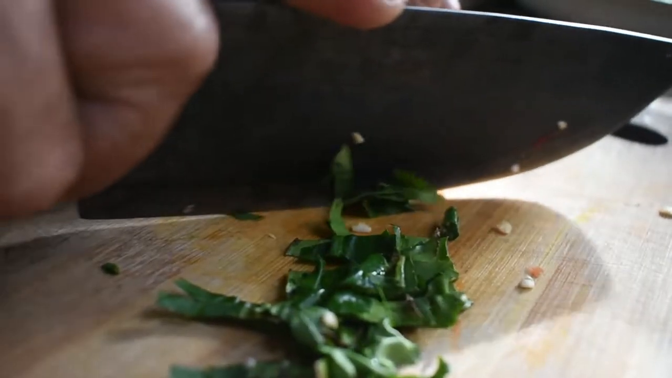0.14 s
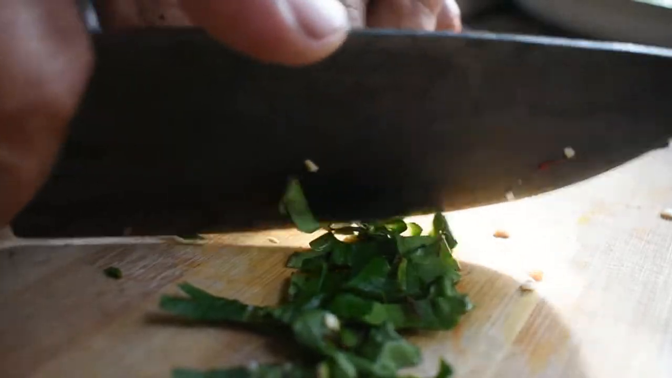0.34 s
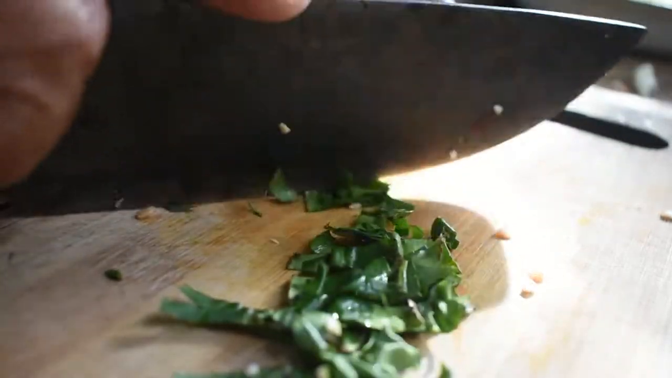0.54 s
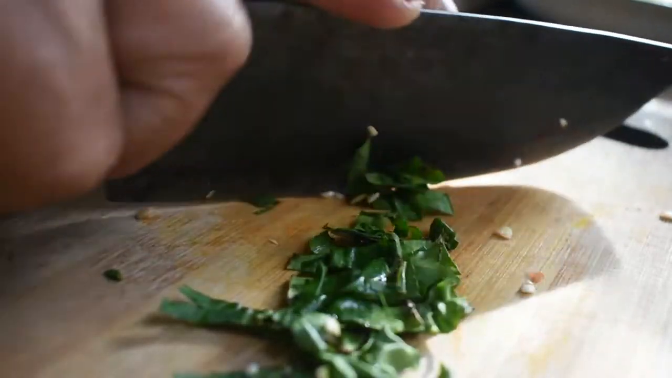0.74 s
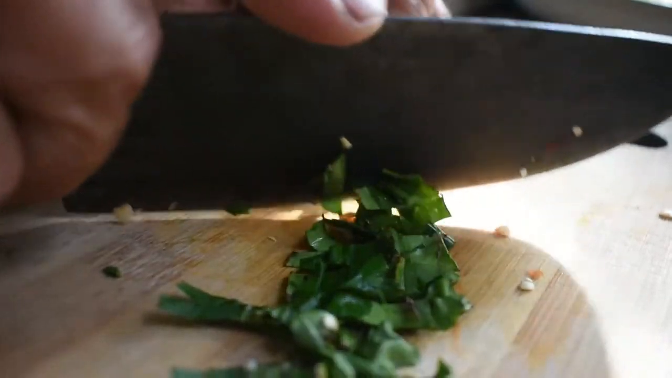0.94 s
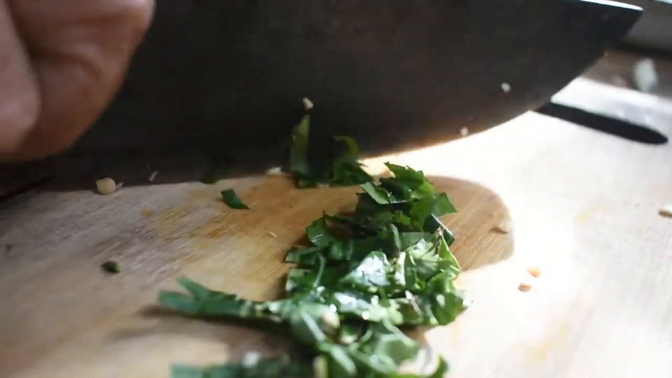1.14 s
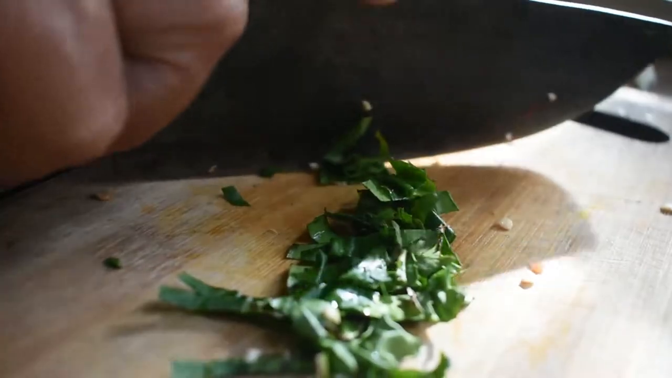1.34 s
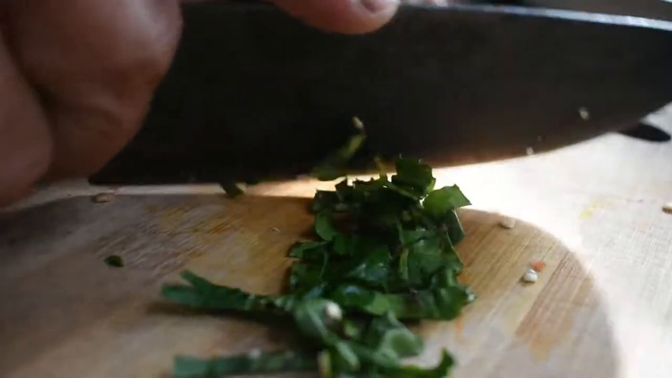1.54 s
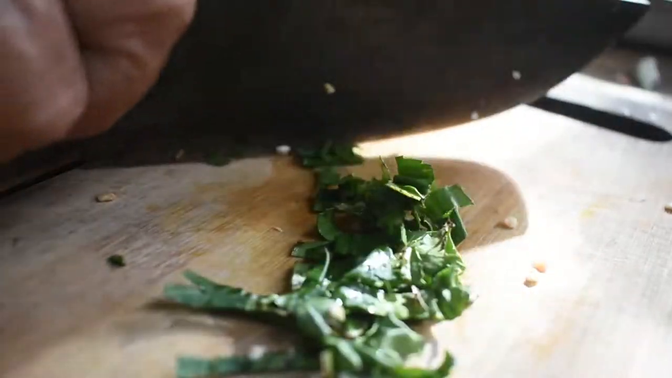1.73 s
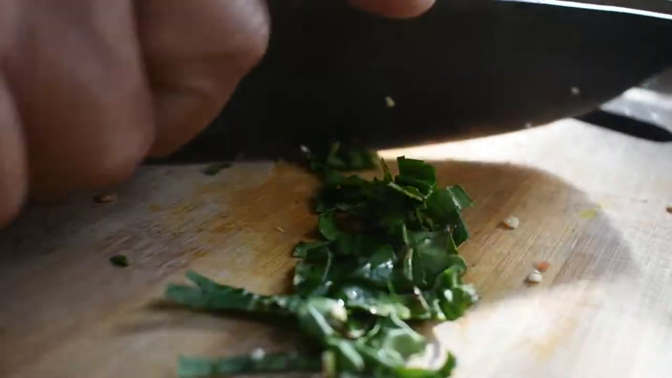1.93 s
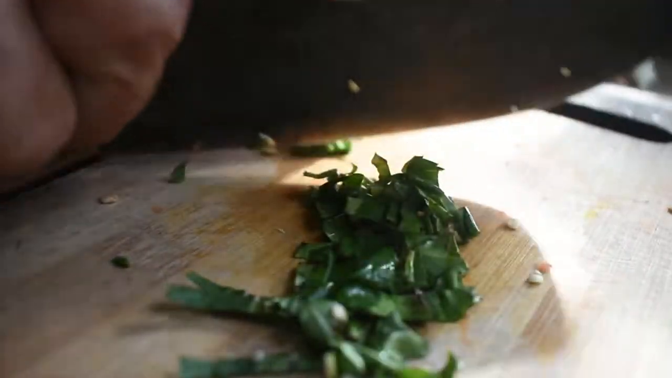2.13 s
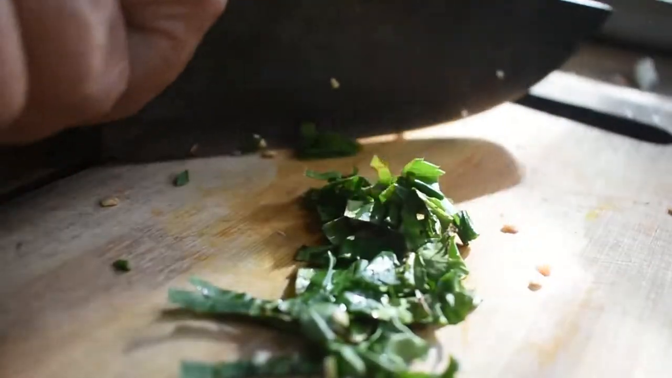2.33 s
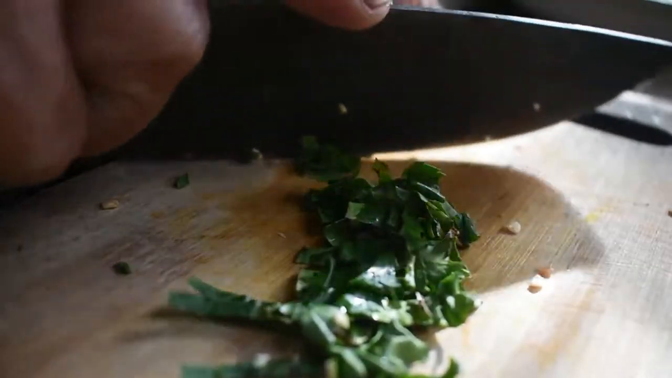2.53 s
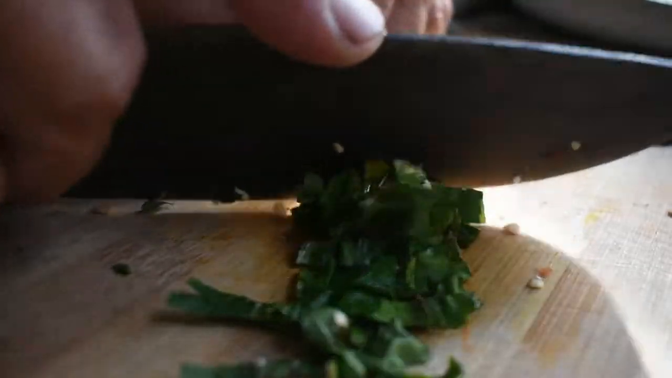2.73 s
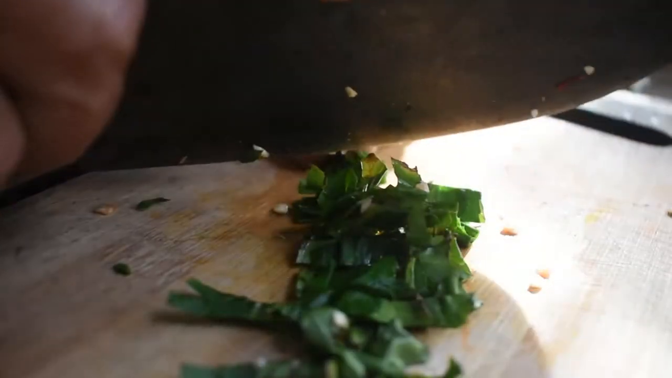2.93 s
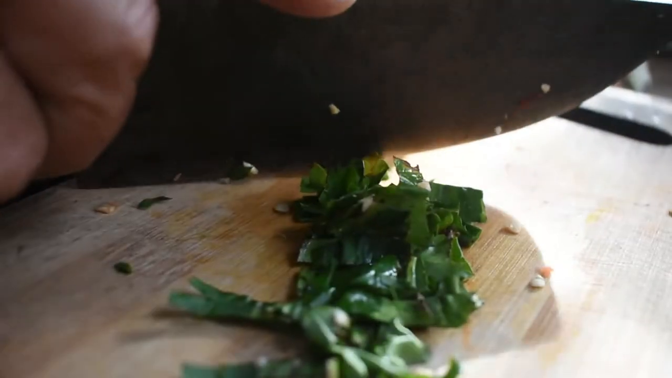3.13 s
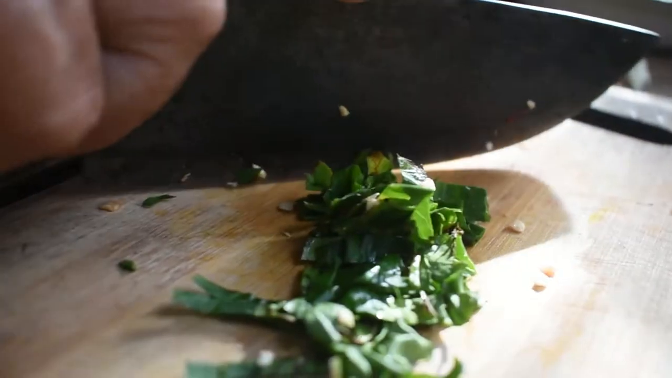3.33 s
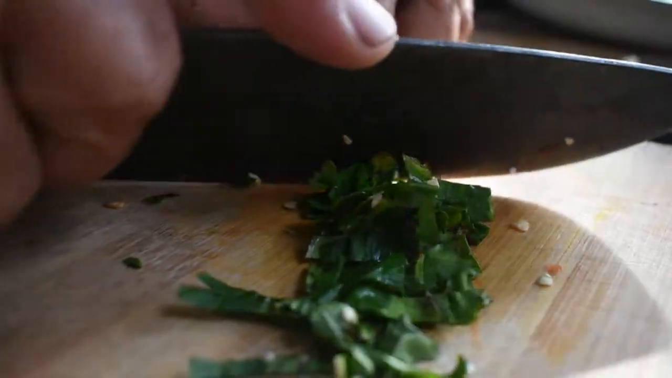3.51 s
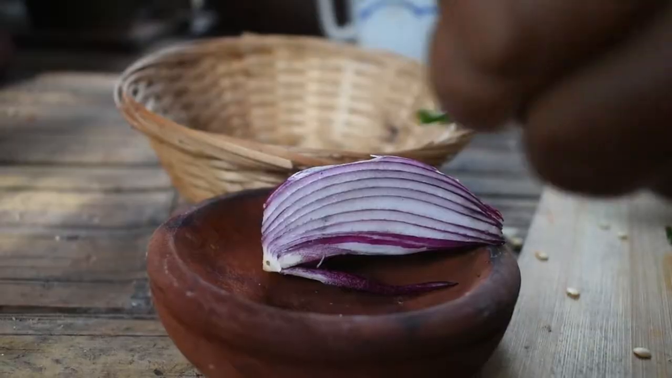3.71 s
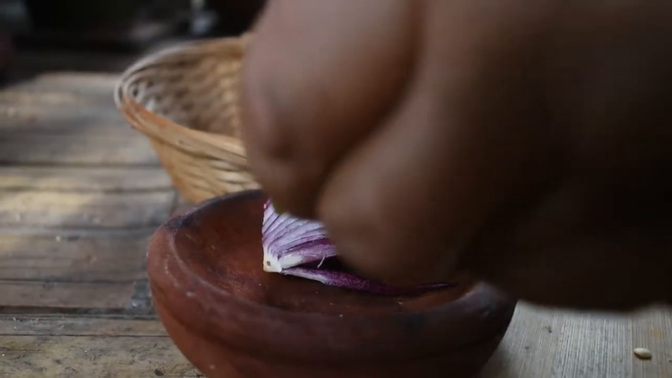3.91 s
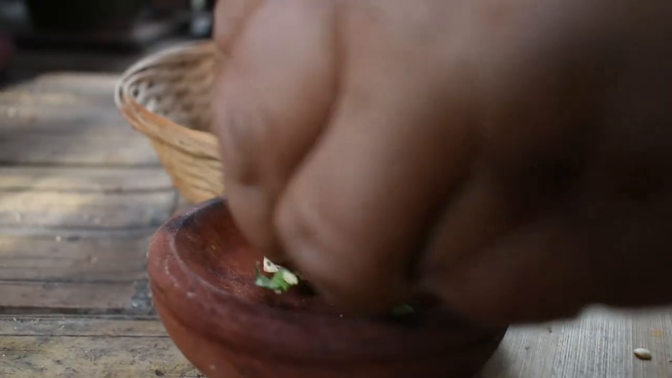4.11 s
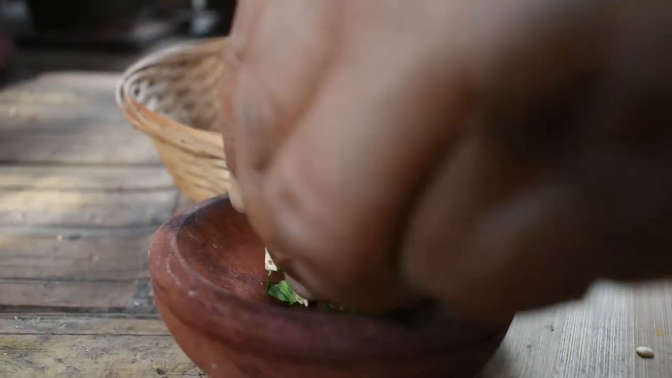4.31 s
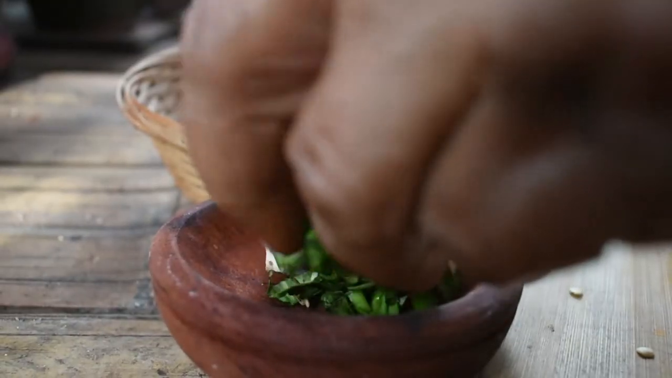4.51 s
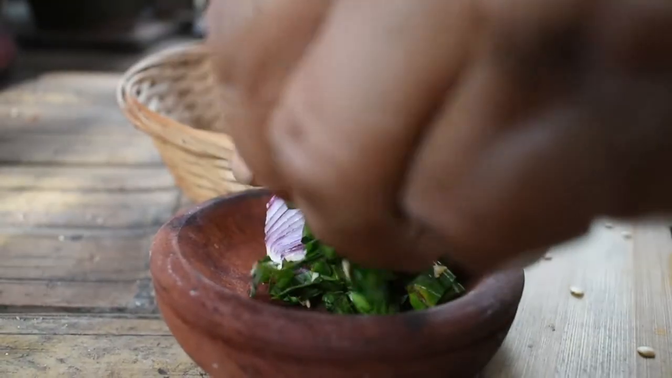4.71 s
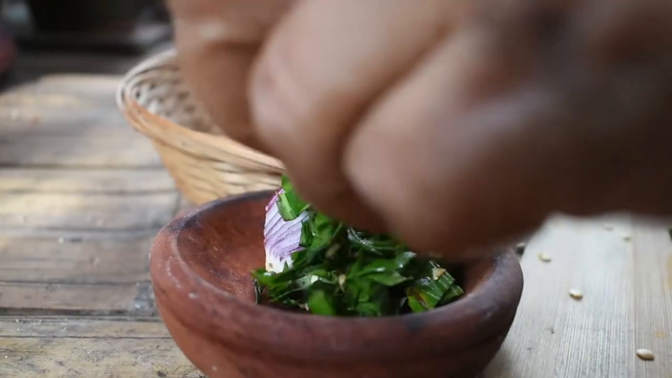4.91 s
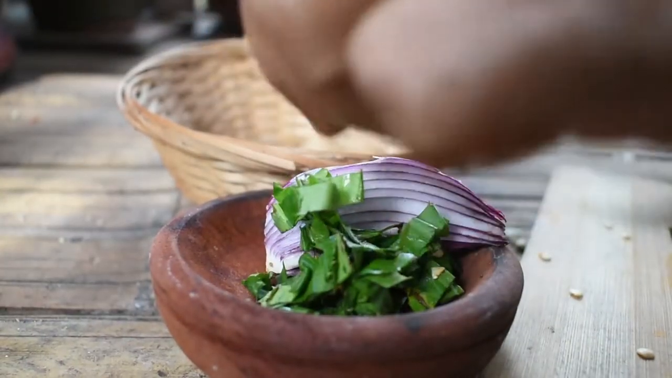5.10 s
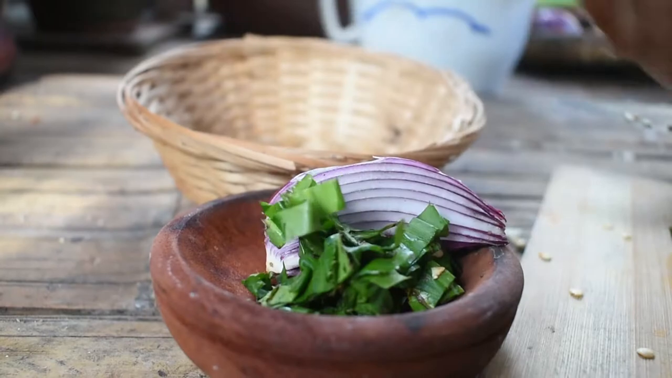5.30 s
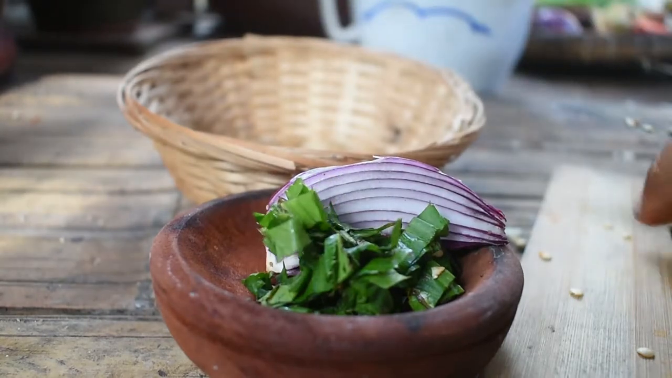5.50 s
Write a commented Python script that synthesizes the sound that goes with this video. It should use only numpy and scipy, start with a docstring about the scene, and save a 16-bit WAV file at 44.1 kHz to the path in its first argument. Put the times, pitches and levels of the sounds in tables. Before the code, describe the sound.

Close crisp chopping of fresh leaves on wood, about two cuts a second, blade scraping back between them, ending in soft settling ticks.

```python
"""Open kitchen: a knife rocks through a heap of leafy greens on a wooden board, close by.
Stems snap after a brief noise swell, the heap crunches, the edge slides: noise grit shaped by the blade's
resonances. Knocks ring the board's modes as damped sines; faint ticks and tinks go on as leaves settle and,
later, a hand drops leaves into a clay bowl. Nearby surfaces answer. A small engine (sine orders of its firing
rate) drones far off over a hush of filtered noise."""
import sys
import numpy as np
from scipy import signal
from scipy.fft import rfft, irfft, next_fast_len
from scipy.io import wavfile
from scipy.ndimage import uniform_filter1d, map_coordinates

SR = 44100
rng = np.random.default_rng(int(sys.argv[2]) if len(sys.argv) > 2 else 0)


def put_to_file(sound):
    """Save the sound as 16-bit audio at rate SR, in the file named by the first command-line argument."""
    columns = np.atleast_2d(sound).T  # one column per channel
    safe = np.clip(columns, -1, 1)
    whole_steps = np.round(safe * 32767)
    wavfile.write(sys.argv[1], SR, whole_steps.astype(np.int16))


N = 244735  # samples

# Blade resting on the board. Each row: resonance in Hz, width in Hz (before the skirts steepen), level in dB.
BLADE_MODES = [(390.7, 200, -11), (695, 500, -1.5), (1051.6, 300, -2.5), (1426, 650, -1), (1640, 350, 0),
               (2076, 350, 0.5), (2428, 350, 9.5), (3029, 570, 8.5), (3590, 600, 0.5), (4240, 1000, 4.5),
               (5080, 860, 2), (6120, 1900, -1.5), (7410, 1000, -8.5), (7980, 2600, -10.5),
               (9680, 3300, -16), (11700, 4000, -17), (13300, 1400, -21), (15000, 2100, -29.5)]


def leaves():
    """Stems snap after a brief noise swell; a heap crunches while the edge travels through it; cut leaves tick."""
    # Single stems. Each row: snap time in seconds, level in dB, wood (lows) in dB, crispness (treble) in dB,
    # ring in Hz. Wood and crispness are relative to the middle band.
    snap_rows = [(0.0338, -15, -11.5, -13.5, 4334), (0.0466, -16, -32, -9.5, 4200),
                 (0.0667, -25.5, -15, -4, 4370), (0.079, -38, -25, 3, 6420), (0.0892, -33, -12, 8.5, 5770),
                 (0.1626, -31.5, -16, 8, 6484), (0.1848, -40.5, -25, 8, 6100),
                 (0.2085, -15.5, -25, 0.5, 5740), (0.5006, -17.5, -25, -16, 3896),
                 (0.579, -43, -29.5, 15.5, 5500), (0.5798, -35.5, -26, -2, 5270),
                 (0.6286, -36, -26, 0, 4500), (0.636, -26, -9, -1, 3100), (0.645, -32, -6, 0, 3170),
                 (0.649, -30, -1, -2, 3070), (0.693, -35.5, -12, 5, 2330), (0.7286, -43, -12, 8, 6420),
                 (1.0557, -46.5, 2, -17, 1410), (1.1918, -27, -21.5, -1.5, 3100),
                 (1.202, -34, -3.5, 1, 2590), (1.2151, -33.5, -3, 0, 2474), (1.228, -33.5, -7, 1, 3030),
                 (1.235, -34, -5, 0.5, 5900), (1.7445, -14.5, -15.5, -7, 8100),
                 (1.8003, -44, 0.5, -5.5, 6480), (1.8034, -19, -8, -4, 6590),
                 (1.8077, -23.5, -6, -2.5, 6400), (2.192, -52, 6, -31.5, 2220),
                 (2.3312, -18.5, -13.5, -6, 2930), (2.3392, -28, 0, 2.5, 5000),
                 (2.546, -44, -10, -12.5, 2480), (2.7289, -19.5, -7.5, -14.5, 1493),
                 (2.9615, -49.5, 5, -13.5, 1520), (3.1633, -53, -2, 12.5, 7130),
                 (3.2596, -35, -5, 3.5, 8544), (3.264, -29, -13, 2, 8410), (3.2681, -32.5, -7, -8, 2443),
                 (3.2866, -38.5, -16.5, 2, 2520), (3.2972, -28, -4, -6, 2500),
                 (3.3033, -16, -7.5, -6.5, 2440), (3.3065, -12.5, -13.5, -4, 2480),
                 (3.4188, -46.5, -25, -2, 5100), (3.4657, -58, -14, 2.5, 6100), (3.4912, -59, -19, 5, 5210),
                 (3.5269, -47, -11.5, -10, 5170), (3.5858, -41, -17, -1.5, 5070),
                 (3.6667, -58.5, -1, -16, 1510), (3.9809, -34.5, -13.5, -5, 2160),
                 (4.3054, -57, -16.5, -19.5, 1900), (4.4588, -53, -21, -15, 2530)]
    # Crunches through many leaves. Each row: start in seconds, length in seconds, first level in dB,
    # last level in dB, crispness in dB, ring in Hz.
    cut_rows = [(0.654, 0.014, -25.5, -22, -4.5, 4523), (0.664, .006, -17, -11, -6.5, 4373),
                (1.176, 0.0042, -32.5, -20, -0.5, 5690), (1.2407, .012, -13, -18, -2, 5794),
                (1.741, .006, -30, -18.5, 1, 2443), (1.812, 0.0052, -23.5, -23.5, 1, 6236),
                (1.8182, 0.0057, -10, -8, -5.5, 2873), (2.297, .0065, -38, -24, 0, 4200),
                (2.3252, 0.0079, -27, -28, -2.5, 5090), (2.3507, 0.011, -25.5, -23.5, -3, 5090),
                (2.363, 0.0056, -12.5, -8.5, -6, 5080), (3.31, 0.004, -17.5, -23, -1, 2510),
                (3.318, .0065, -10.5, -12, -7.5, 4966), (4.006, 0.0064, -25.5, -30, -5.5, 2410)]
    # Cut leaves settling. Each row: from in seconds, to in seconds, number of ticks.
    settling_rows = [(3.04, 3.24, 10), (3.44, 3.53, 3)]
    swell_s, swell_end_db, swell_growth_db = 0.008, -18.5, 22
    stem_swell_db = -8  # the swell before a single snap is fainter
    snap_rise_s, snap_t60_at_4khz_s, snap_ring_db = 0.0003, 0.017, 8
    thin_power = 0.3  # thin, high stems die faster, by this power of pitch
    cut_t60_s, cut_wood_db, cut_ring_db = 0.017, -8.5, -0.5
    settle_db, settle_scatter_db, settle_crisp_db, settle_hz = -63, 0.5, 5, 6760
    snap_lumpy_db, cut_lumpy_db = 2.2, 3.3

    out = np.zeros(N)
    t = np.arange(-swell_s, 0.1, 1 / SR)  # the snap is at 0
    swell = amp(swell_end_db + swell_growth_db * t / swell_s) * (t < 0)
    bite = 1 - np.exp(-np.maximum(t, 0) / snap_rise_s)

    def snap_envelope(ring_hz):
        decay = amp(-60 * t / snap_t60_at_4khz_s * (ring_hz / 4000) ** thin_power)
        return amp(stem_swell_db) * swell + bite * decay

    for s, db, wood_db, crisp_db, ring_hz in snap_rows:
        envelope = amp(db) * snap_envelope(ring_hz)
        add(out, s - swell_s, burst(envelope, wood_db, crisp_db, snap_lumpy_db, ring_hz, snap_ring_db))
    for s, length_s, first_db, last_db, crisp_db, ring_hz in cut_rows:
        travel_db = np.interp(t, [0, length_s], [first_db, last_db])
        travel_db = travel_db - 60 * np.maximum(t - length_s, 0) / cut_t60_s
        envelope = amp(travel_db) * (swell + bite)
        add(out, s - swell_s, burst(envelope, cut_wood_db, crisp_db, cut_lumpy_db, ring_hz, cut_ring_db))
    for first_s, last_s, ticks in settling_rows:
        for s in rng.uniform(first_s, last_s, ticks):
            envelope = amp(rng.normal(settle_db, settle_scatter_db)) * snap_envelope(settle_hz)
            add(out, s, burst(envelope, 0, settle_crisp_db, snap_lumpy_db, settle_hz, snap_ring_db))
    return out


def burst(envelope, wood_db, crisp_db, lumpy_db, ring_hz, ring_db):
    """Grit under an envelope, rung through the blade and lifted near the stem's own pitch."""
    held = grip(BLADE_MODES, scatter_db=2.0)

    def response(hz):
        return modes(held, hz, order=2) * peak(hz, ring_hz, 0.15 * ring_hz, ring_db)

    fibres = envelope * grit(len(envelope), 1500, lumpy_db)
    bands = thirds(fibres, response)
    envelope_rms = np.sqrt(np.mean(envelope ** 2))
    return amp([wood_db, 0, crisp_db]) @ bands * envelope_rms


def board():
    """Each knock rings the board's modes near its own pitch, damped by the hand; small tinks ring one mode."""
    # Board when knocked. Each row: mode in Hz, level in dB, t60 in seconds before the hand's damping.
    board_modes = [(121, -9, 0.25), (162, -11, 0.042), (228.6, -11, 0.18), (410, -11.5, 0.048),
                   (583, -4, 0.046), (687.4, 3.5, 0.04), (858.4, -2, .05), (992, -3, 0.056),
                   (1265, 4.5, 0.035), (1560, -2.5, 0.069), (2300, -4, 0.096), (2400, 0, 0.084),
                   (2950, -13, .025)]
    # Edge or fingers meeting the wood. Each row: time in seconds, peak in dB, strongest pitch in Hz,
    # spread in octaves (6 dB down), ring length as a share of t60.
    knock_rows = [(.046, -18, 600, 0.53, 0.44), (.074, -29, 646, 0.25, 0.33), (.330, -29, 604, 0.32, 0.74),
                  (0.4768, -36.5, 887, 0.18, 0.7), (.583, -42.5, 163, 0.31, 2),
                  (.670, -9.5, 800, 1.06, 0.4), (.885, -27, 1170, 0.77, 0.56), (1.054, -32, 833, 0.2, 0.62),
                  (1.179, -43, 189, 0.54, 0.82), (1.251, -11, 656, 1.07, 0.36),
                  (1.476, -29, 609, 0.16, 1.2), (1.824, -4, 766, 1.06, 0.52),
                  (1.995, -23, 1262, 0.11, 0.97), (1.996, -34, 404, 0.16, 3.4),
                  (2.19, -24.5, 553, 0.14, 0.65), (2.192, -29.5, 1735, 0.77, 0.18),
                  (2.368, -4, 686, 1.05, 0.49), (2.7307, -25, 1400, 0.36, 0.25),
                  (3.323, -6.5, 675, 1.02, 0.54), (4.008, -25.5, 720, 0.98, 0.77)]
    # Faint pitched tinks. Each row: time in seconds, level in dB before the rise, pitch in Hz.
    tink_rows = [(0.1275, -24, 2490), (.501, -37, 3000), (2.1922, -42.5, 2284), (3.042, -49.5, 2520),
                 (3.1423, -53.5, 2600), (3.2229, -53, 2540), (4.233, -54, 3283), (4.306, -50.5, 1877),
                 (4.405, -57, 1896), (4.4578, -41.5, 2485), (4.9688, -52.5, 1920), (5.318, -59.5, 3400)]
    rise_s, tink_t60_s = 0.002, 0.075

    out, t = np.zeros(N), np.arange(SR // 5) / SR
    hz, level_db, t60_s = np.transpose(board_modes)[:, :, None]
    rise = 1 - np.exp(-t / rise_s)
    for s, db, pitch_hz, spread_oct, share in knock_rows:
        near_db = -6 * (np.log2(hz / pitch_hz) / spread_oct) ** 2
        chance_db = rng.normal(0, 1.5, hz.shape)
        mode_gain = amp(level_db + near_db + chance_db - 60 * t / (share * t60_s))
        ring = rise * np.sum(mode_gain * np.sin(2 * np.pi * hz * t), axis=0)
        add(out, s, amp(db) * ring / np.abs(ring).max())
    for s, db, tink_hz in tink_rows:
        add(out, s, amp(db - 60 * t / tink_t60_s) * rise * np.sin(2 * np.pi * tink_hz * t))
    return out


def slides():
    """Pushes are damped by the leaves and crackle; draws over the bare board ring more freely."""
    # Blade drawn back on its edge. Each row: resonance in Hz, width in Hz (before the skirts steepen),
    # level in dB.
    free_blade_modes = [(404, 246, -6.5), (703, 197, 3), (875, 160, -8.5), (1206, 370, 2.5),
                        (1750, 740, -3), (2143, 300, -3), (2563, 250, 1), (2670, 140, -5),
                        (3050, 470, -3.5), (3896, 740, -8.5), (4650, 910, -7), (5000, 170, -1),
                        (5960, 1100, -8), (7210, 1000, -18.5), (8470, 1900, -27.5), (10130, 800, -26),
                        (11360, 600, -21), (12450, 1100, -27.5), (13220, 500, -28), (15000, 1000, -36.5)]
    # Edge pushed on through cut leaves. Each row: start in seconds, drag in seconds, lift-off in seconds,
    # first level in dB, last level in dB, wood in dB, crispness in dB, favoured pitch in Hz.
    push_rows = [(0, 0.025, .012, -57.5, -54, -3, -7, 4300),
                 (0.04, .165, .012, -37.5, -39, -10.5, -7, 1950),
                 (.218, 0.019, 0.065, -47, -52, -20, -8.5, 2480),
                 (.51, 0.052, .02, -44, -61, -11, -13, 3100), (.68, .11, 0.028, -32, -40, -9, -8.5, 4300),
                 (1.265, .095, .025, -37.5, -45, -5.5, -3, 5470),
                 (1.76, 0.037, 0.011, -45, -51, -1, -7.5, 2500),
                 (1.84, 0.064, 0.071, -39.5, -43.5, -0.5, -5.5, 4000),
                 (2.385, .056, .045, -41.5, -46.5, 4.5, -9.5, 6440),
                 (2.743, 0.042, 0.034, -50.5, -57.5, 1, -6.5, 5520),
                 (3.34, .04, 0.034, -46.5, -54, 7, -6, 2500),
                 (3.375, .05, 0.062, -61, -50.5, -11, -8, 4700),
                 (4.02, .032, .012, -59, -62.5, 4, -4, 5000)]
    # Edge drawn back. Each row: the same columns, then the time to gather speed in seconds.
    draw_rows = [(.274, 0.084, 0.029, -49, -48, -5, -5.5, 7300, 0.012),
                 (.87, .09, 0.019, -33, -51, -5, -9, 2220, 0.012),
                 (1.458, 0.085, 0.039, -34, -48.5, -4.5, -7.5, 6320, 0.015),
                 (1.983, 0.077, 0.045, -31, -38, -7, -10, 6950, .012),
                 (2.554, .105, 0.073, -28.5, -30.5, -2, -9, 2800, .022),
                 (3.53, 0.072, 0.073, -53.5, -45, -6.5, -14.5, 5370, .015)]

    out = np.zeros(N)
    for s, *row in push_rows:  # heavy just after the chop; the wood fades on the way
        add(out, s, stroke(row, BLADE_MODES, entry_db=8, entry_s=0.014, drift_db=-15.5, bite_db=1,
                           lumpy_db=1.5, scatter_db=4.0, spikes=180))
    for s, *row, entry_s in draw_rows:  # gathers speed; the wood grows on the way
        add(out, s, stroke(row, free_blade_modes, entry_db=-21, entry_s=entry_s, drift_db=7, bite_db=1.5,
                           lumpy_db=1.5, scatter_db=2, spikes=0))
    return out


def stroke(row, table, entry_db, entry_s, drift_db, bite_db, lumpy_db, scatter_db, spikes):
    """One slide of the edge, entry, drag and lift-off: friction grit into the blade's modes."""
    lift_off_db, lift_off_treble_db = -20, -4  # change at lift-off; the treble's comes on top
    touch_s = 0.0048
    drag_s, lift_s, first_db, last_db, wood_db, crisp_db, bite_hz = row
    t = np.arange(0, drag_s + lift_s, 1 / SR)
    db = np.interp(t, [0, drag_s, drag_s + lift_s], [first_db, last_db, last_db + lift_off_db])
    db = db + np.interp(t, [0, entry_s], [entry_db, 0])
    held = grip(table, scatter_db)

    def response(hz):
        return modes(held, hz, order=3) * peak(hz, bite_hz, 0.16 * bite_hz, bite_db)

    friction = grit(len(t), 500, lumpy_db, spikes) * amp(2.2 * wobble(50, size=len(t)))
    bands = thirds(friction, response)
    low_db = db + wood_db + drift_db * t / t[-1]
    high_db = db + crisp_db + lift_off_treble_db * np.maximum(t - drag_s, 0) / lift_s
    touch = np.clip(np.minimum(t, t[-1] - t) / touch_s, 0, 1)
    return touch * np.sum(amp([low_db, db, high_db]) * bands, axis=0)


def jolt():
    """A chop shakes the table and the microphone once: a slow push that peaks after rise_s."""
    start_s, peak_db, rise_s = 3.322, -26.5, 0.0016
    u = np.maximum(np.arange(N) / SR - start_s, 0) / rise_s
    return amp(peak_db) * u * np.exp(1 - u)


def kitchen(x):
    """Nearby surfaces answer with a noise tail in which each frequency dies at its own speed."""
    # Each row: frequency in Hz, t60 in seconds.
    t60_points = [(200, 0.092), (2000, 0.06), (10000, 0.019)]
    hz, t, z = signal.stft(rng.standard_normal(SR // 3), SR, nperseg=256)
    decay = amp(-60 * t / along(t60_points, hz)[:, None])
    tail = signal.istft(z * decay, SR, nperseg=256)[1]
    delayed = np.pad(x, (130, 0))  # samples
    return signal.fftconvolve(delayed, tail / np.linalg.norm(tail))[:N]


def engine():
    """Orders of the firing rate, each wavering on its way through the air."""
    # Each row: time in seconds, firing rate in Hz, rms level in dB of a 0 dB order.
    drone_rows = [(0.801, 71.5, -73.5), (1.4, 73.3, -71.5), (2.202, 75.16, -70.5), (2.5, 77.43, -68),
                  (3.2, 77, -66.5), (3.7, 77.64, -73.5), (4.2, 77.6, -78)]
    # Each row: multiple of the firing rate, level in dB.
    exhaust_orders = [(1, -17), (2, -8), (3, -9), (4, -1), (5, -1), (6, 0), (7, -10), (8, -4), (9, -13),
                      (12, -13)]
    s, hz, db = np.transpose(drone_rows)
    t = np.arange(N) / SR
    firing_hz = np.interp(t, s, hz) * (1 + 0.0013 * wobble(12))
    turn = 2 * np.pi * np.cumsum(firing_hz) / SR
    orders = np.zeros(N)
    for k, level_db in exhaust_orders:
        waver = amp(level_db + 1.5 * wobble(6))
        orders += waver * np.sin(k * turn + rng.uniform(0, 2 * np.pi))
    return np.sqrt(2) * amp(np.interp(t, s, db, left=-120, right=-120)) * orders


def hush():
    """Air noise with faint patches in time and frequency, coloured and slowly changing in level."""
    # Each row: frequency in Hz, relative density in dB per Hz.
    colour_points = [(15, -14), (30, -7), (60, -1.5), (116, -8), (175, -4.5), (350, -1.5), (655, -3.5),
                     (1090, -5), (1880, -8), (2890, -11.5), (6000, -18), (10000, -23.5), (15800, -33.5)]
    # Each row: time in seconds, rms level in dB.
    level_points = [(0, -58), (2, -58.5), (3.0, -59), (3.65, -62.5), (3.749, -63.5), (5.55, -61.5)]
    z = signal.stft(rng.standard_normal(N), nperseg=512)[2]
    patches = uniform_filter1d(rng.standard_normal(z.shape), 6, 0)
    patches = uniform_filter1d(patches, 14, 1)
    patch_gain = amp(0.6 * patches / patches.std())
    air = signal.istft(z * patch_gain, nperseg=512)[1][:N]
    coloured = filtered(air, lambda hz: amp(along(colour_points, hz)))
    s, db = np.transpose(level_points)
    return amp(np.interp(np.arange(N) / SR, s, db)) * unit(coloured)


def grit(size, rate, lumpy_db, spikes=0):
    """Noise of uneven grain: fibres give way in clumps, a few of them (spikes a second) with a crack."""
    cracks = 1.6 * rng.exponential(size=size) * (rng.random(size) < spikes / SR)
    crack_gain = np.convolve(cracks, amp(-2 * np.arange(16)))[:size]
    clumps = amp(lumpy_db * wobble(rate, size=size))
    return rng.standard_normal(size) * (clumps + crack_gain)


def grip(table, scatter_db):
    """The modes take new strengths wherever the blade is held or touched."""
    return np.array(table) + np.outer(rng.normal(0, scatter_db, len(table)), [0, 0, 1])


def modes(table, hz, order):
    """Resonances that add in power, with a causal system's phase (folded cepstrum); order steepens the skirts."""
    power = 0
    for centre, width, db in table:
        damping = (hz * width) ** 2
        power = power + amp(2 * db) * (damping / ((centre ** 2 - hz * hz) ** 2 + damping)) ** order
    cepstrum = irfft(np.log(power + 1e-12) / 2)
    cepstrum[1:len(hz) - 1] *= 2
    cepstrum[len(hz):] = 0
    return np.exp(rfft(cepstrum))


def peak(hz, centre_hz, width_hz, db):
    """A flat response with one resonance added on top at db."""
    return 1 + amp(db) * 1j * hz * width_hz / (centre_hz ** 2 - hz * hz + 1j * hz * width_hz)


def thirds(x, response):
    """x through a response, split into lows, middle and top, each of rms 1."""
    def split(hz):
        low = 1 / (1 + (hz / 1500) ** 6)
        high = 1 - 1 / (1 + (hz / 6200) ** 8)
        return response(hz) * np.array([low, 1 - low - high, high])
    return unit(filtered(x, split))


def filtered(x, response):
    """x times a complex response of frequency."""
    m = 2 * next_fast_len(x.shape[-1] // 2 + 2048)  # even, zero-padded
    return irfft(rfft(x, m) * response(np.fft.rfftfreq(m, 1 / SR)), m)[..., :x.shape[-1]]


def wobble(rate, size=N):
    """A smooth random curve, rate knots a second."""
    knots = rng.standard_normal(int(size * rate / SR) + 4)
    return map_coordinates(knots, [np.arange(size) * rate / SR])


def along(points, hz):
    """Interpolates (Hz, value) points on a log frequency axis."""
    f, v = np.transpose(points)
    return np.interp(np.log(hz + 1), np.log(f + 1), v)


def amp(db):
    """Decibels to gain."""
    return 10 ** (np.asarray(db) / 20)


def unit(x):
    """Scales to rms 1 along the last axis."""
    return x / np.sqrt(np.mean(x ** 2, axis=-1, keepdims=True) + 1e-20)


def add(track, s, sound):
    """Mixes a sound in at s seconds."""
    part = track[round(s * SR):][:len(sound)]
    part += sound[:len(part)]


def scene():
    """Knife and board in their room, over engine and hush."""
    near = leaves() + board() + slides()
    near = filtered(near, lambda hz: (1j * hz / (90 + 1j * hz)) ** 3)  # the close sounds carry no deep bass
    room = amp(-13.0) * kitchen(near)
    return (near + room + jolt() + engine() + hush())[None]


def record(dry):
    """The capsule peaks in the treble and loud peaks clip softly; a low cut and the band limit follow."""
    ceiling, low_cut_hz, top_hz = 0.95, 80, 15988
    heard = filtered(dry, lambda hz: peak(hz, 8250, 670, 0))
    clipped = heard / (1 + np.abs(heard / ceiling) ** 6) ** (1 / 6)
    return filtered(clipped, lambda hz: (1j * hz / (low_cut_hz + 1j * hz)) ** 2 * (hz < top_hz))


dry = scene()
out = record(dry)
put_to_file(out)
```